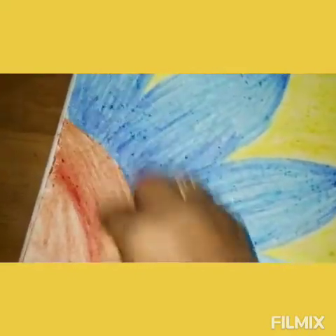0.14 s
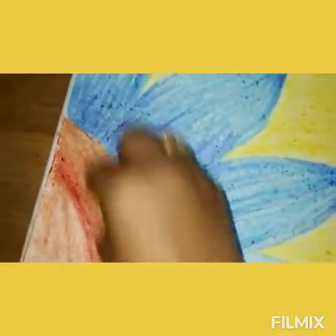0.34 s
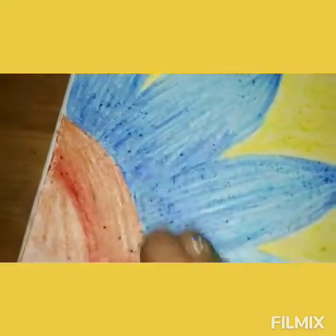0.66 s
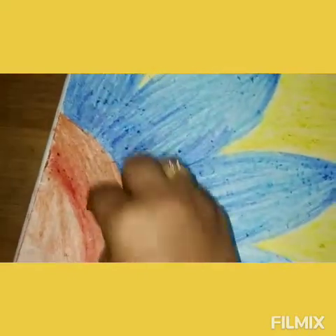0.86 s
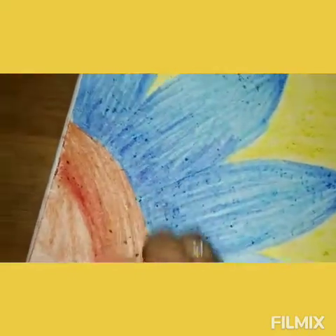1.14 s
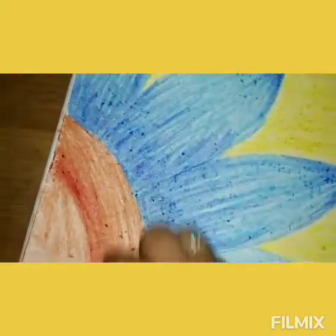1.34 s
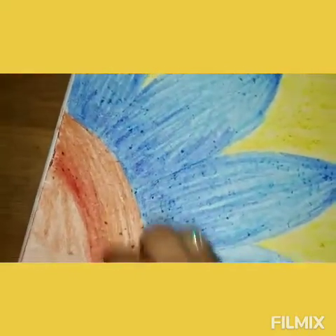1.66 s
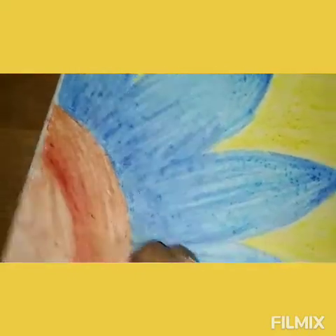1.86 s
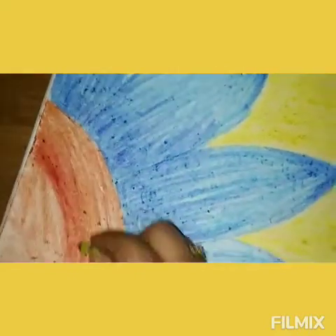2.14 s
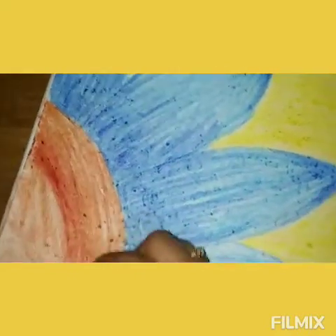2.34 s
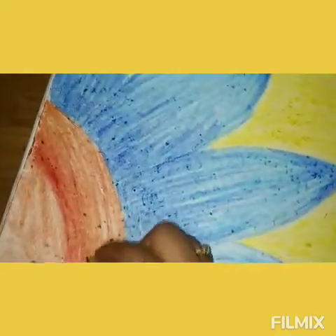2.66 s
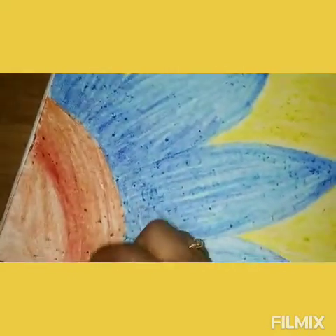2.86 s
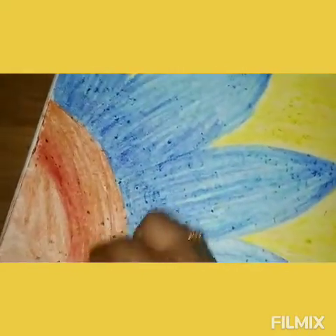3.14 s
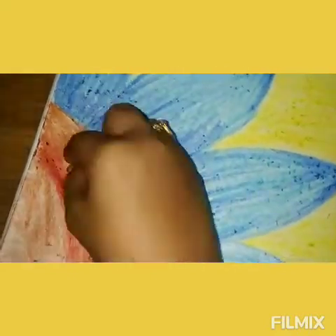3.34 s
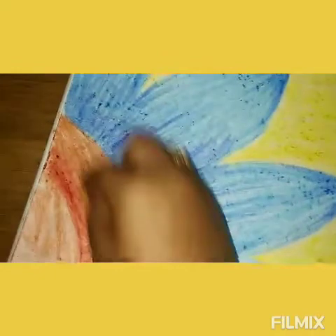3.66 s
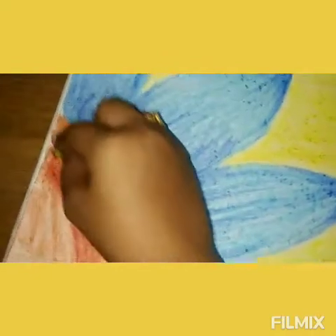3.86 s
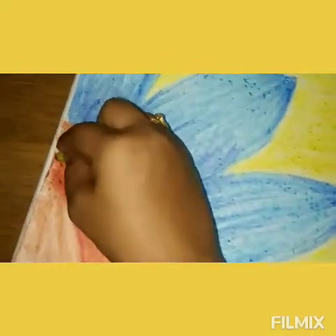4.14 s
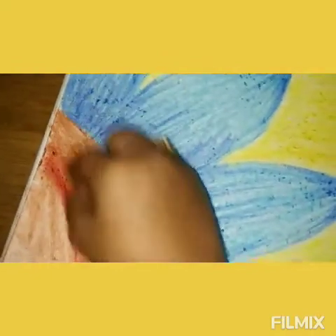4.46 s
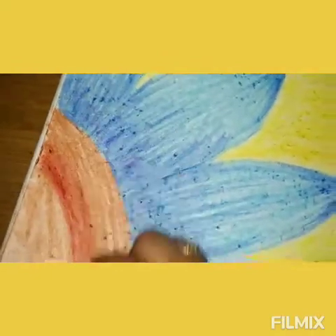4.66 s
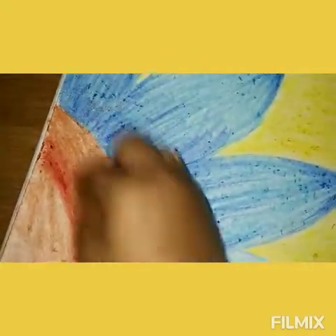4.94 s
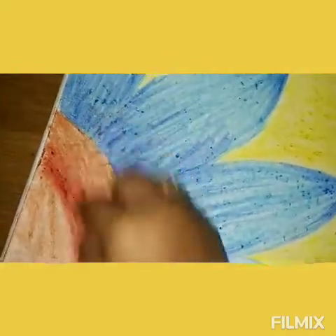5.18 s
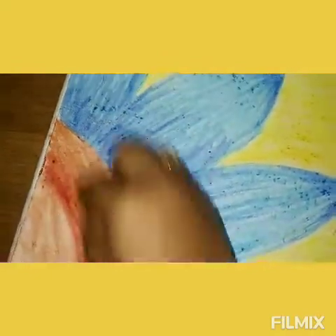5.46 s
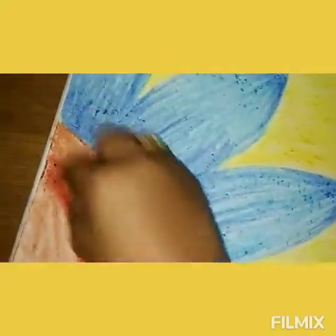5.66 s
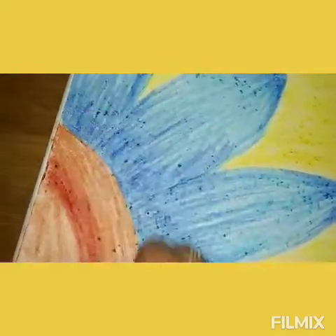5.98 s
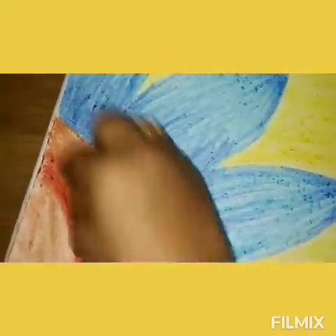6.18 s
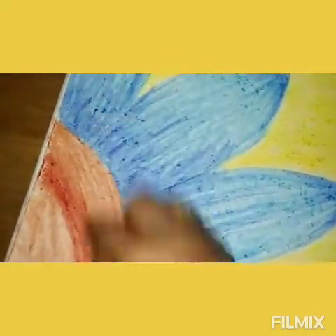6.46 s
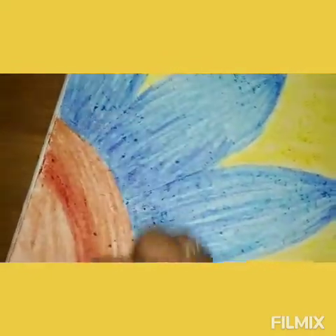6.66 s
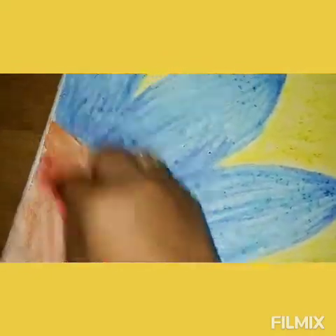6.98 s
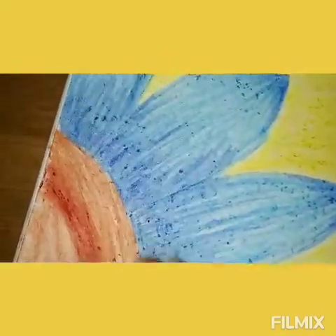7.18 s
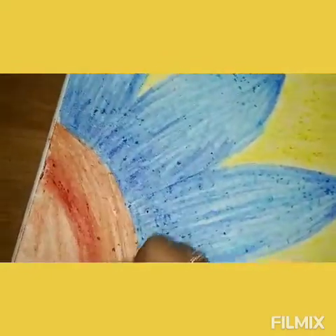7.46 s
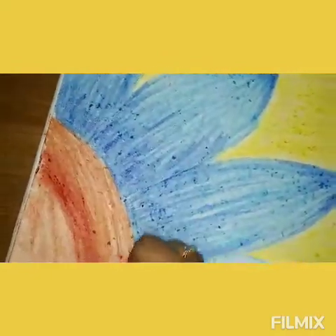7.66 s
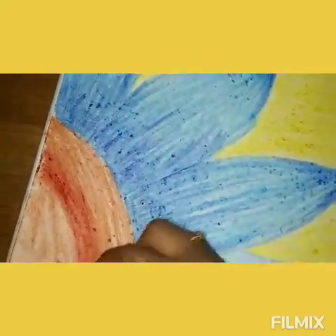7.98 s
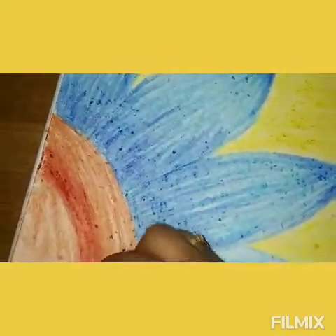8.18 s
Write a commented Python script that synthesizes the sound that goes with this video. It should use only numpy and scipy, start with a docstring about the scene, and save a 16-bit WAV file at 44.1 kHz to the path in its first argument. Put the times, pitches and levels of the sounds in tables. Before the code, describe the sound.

A wax crayon colours paper on a wooden table in short dry strokes, broken by hard scratchy scrapes and clicks, in a quiet room.

```python
"""Wooden table in a quiet room: a wax crayon colours a sheet of paper close to the left port of a phone.
Soft strokes: patchy noise of random contacts hisses on the paper's tooth. Hard scrapes: a dense crackle
of slips rings the sheet and shakes the table. Snaps: a few decaying rings; bumps of the hand: low swings.
The right port hears the crayon later, duller and shaded by the phone's body; a steady room tone lies below."""
import sys
import numpy as np
from scipy import signal
from scipy.fft import rfft, irfft, next_fast_len
from scipy.io import wavfile
from scipy.ndimage import uniform_filter1d

SR = 44100
rng = np.random.default_rng(int(sys.argv[2]) if len(sys.argv) > 2 else 0)


def waveform_to_disk(signal):
    """Save audio, clipped to [-1, 1], as 16-bit WAV at the path in sys.argv[1]."""
    frames = np.transpose(np.atleast_2d(signal))
    scaled = np.clip(frames, -1, 1) * 32767
    samples = np.round(scaled).astype(np.int16)
    wavfile.write(sys.argv[1], SR, samples)


N = 366912
PORT_LAG_S = 0.00009  # right port after left


def amp(db):
    """Decibels to gain."""
    return 10 ** (np.asarray(db) / 20)


def unit(x):
    """Scaled to rms 1."""
    return x / np.sqrt(np.mean(x ** 2) + 1e-20)


def along(points, hz):
    """(Hz, value) points interpolated on a log frequency axis."""
    f, v = np.transpose(points)
    return np.interp(np.log(hz + 1), np.log(f + 1), v)


def colour(points):
    """Zero-phase gain response through (Hz, dB) points."""
    return lambda hz: amp(along(points, hz))


def filtered(x, response):
    """x times a complex response of frequency, zero-padded by half a second or more."""
    m = next_fast_len(N + SR // 2)
    spectrum = rfft(x, m) * response(np.fft.rfftfreq(m, 1 / SR))
    return irfft(spectrum, m)[..., :N]


def noise(points):
    """Coloured noise of rms 1."""
    return unit(filtered(rng.standard_normal(N), colour(points)))


def modes(table):
    """Causal response of parallel resonances with alternating sign."""
    def response(hz):
        total = 0
        for k, (centre_hz, width_hz, db) in enumerate(table):
            damping = 1j * hz * width_hz
            total = total + (-1) ** k * amp(db) * damping / (centre_hz ** 2 - hz ** 2 + damping)
        return total
    return response


def skirt(hz):
    """The thin sheet radiates no bass: a steep double high-pass."""
    s = 1j * hz / 950
    return (s * s / (s * s + 1.285 * s + 1)) ** 2


def grit(rate_hz, spread_db):
    """Random contacts of uneven size, rms 1."""
    hits = rng.random(N) < rate_hz / SR
    sizes = rng.standard_normal(N) * amp(spread_db * rng.standard_normal(N))
    return unit(hits * sizes)


def patchy(x, depth_db):
    """Random gain in patches of pitch and time."""
    z = signal.stft(x, nperseg=512)[2]
    field = uniform_filter1d(rng.standard_normal(z.shape[-2:]), 6, 0)
    field = uniform_filter1d(field, 10, 1)
    return signal.istft(z * amp(depth_db * unit(field)), nperseg=512)[1][..., :N]


def tooth(points, patchy_db):
    """Coloured contacts with the tooth of the paper, rms 1."""
    return unit(filtered(patchy(grit(9000, spread_db=1), patchy_db), colour(points)))


# strokes: start t/s, length/s, level/dB, swell start to end/dB, dull share/dB, table rumble level/dB
STROKE_EVENTS = [(-0.03, 0.078, -73, 8.5, 2.5, -78), (0.139, 0.13, -61.5, 5, -2.5, -74),
                 (0.352, 0.12, -61.5, 0, -4, -74), (0.525, 0.18, -62.5, -1, 1, -68.5),
                 (0.778, 0.12, -63, 1.5, -1.5, -74), (0.972, 0.14, -61, 2.5, -3.5, -75),
                 (1.214, 0.078, -65.5, -0.5, -2.5, -81), (1.396, 0.081, -63.5, -1, -4, -76.5),
                 (1.562, 0.076, -66, 2, -3.5, -78), (1.71, 0.1, -62.5, 2.5, -5.5, -93),
                 (1.852, 0.048, -68, 2, 8.5, -64), (2.264, 0.018, -64, -16, -1, -81),
                 (2.471, 0.042, -74, 3, 2, -90), (2.573, 0.047, -67, 5, 2.5, -76),
                 (2.675, 0.064, -75.5, 7, 0, -89), (2.822, 0.048, -76, 3, 8, -97),
                 (2.943, 0.05, -75.5, 5, 3, -78), (3.076, 0.056, -69.5, -1.5, 4.5, -83),
                 (3.206, 0.202, -55, 12.5, -8, -67), (3.477, 0.15, -57, 5, -3, -76),
                 (3.668, 0.13, -55.5, -7.5, -1.5, -59), (4.266, 0.026, -74, 4, 6, -82),
                 (4.495, 0.26, -63.5, 3, 1, -76), (4.882, 0.19, -59.5, -1.5, -2.5, -70),
                 (5.176, 0.17, -59.5, 17, 2.5, -71.5), (5.456, 0.18, -57, -4, -3, -65.5),
                 (5.748, 0.21, -65, -9.5, 4, -70.5), (6.102, 0.23, -55.5, 2, -4.5, -67),
                 (6.434, 0.18, -53.5, -1.5, -7.5, -69.5), (6.75, 0.18, -63, 3, 0, -69.5),
                 (7.125, 0.15, -58, -7.5, -2, -70), (7.524, 0.044, -75, -1, -0.5, -81.5),
                 (7.653, 0.063, -66, -15.5, -9, -93), (7.748, 0.049, -67.5, 6, -1.5, -79),
                 (7.874, 0.06, -67.5, 2, 1, -87), (7.983, 0.042, -77, -3, 4.5, -83),
                 (8.097, 0.056, -72.5, 5, 3, -82), (8.259, 0.073, -78.5, 7, 4, -87)]
# fine tooth: f/Hz, relative density/(dB per Hz)
FINE_TOOTH = [(2000, -26.5), (3300, -15), (4500, -4), (5300, 1), (6200, 2), (6900, -1), (7700, 0.5),
              (8300, -12.5), (9500, -37)]
# broad rub: f/Hz, relative density/(dB per Hz)
BROAD_RUB = [(400, -21), (1000, 0), (1600, 0), (2200, -4.5), (3500, -2.5), (4800, 0.5), (7000, -35)]
# finest dust: f/Hz, relative density/(dB per Hz)
FINEST_DUST = [(7000, -28), (8500, 5), (10300, 2), (12000, -3.5), (13000, -15), (15500, -25)]
# table top resonances: f/Hz, width/Hz, level/dB
TABLE_MODES = [(172, 25.2, -1), (303, 38, 3.5), (585.5, 30, -0.5)]
ARCH_DB, DUST_SHARE_DB = 2.5, -9  # a stroke is fastest, so loudest, halfway; share of the finest dust


def strokes():
    """Each stroke speeds up, runs over the tooth of the paper and lifts off; the table hums along."""
    t = np.arange(N) / SR
    fine, dull, rumble = np.zeros((3, N))
    for start_s, length_s, db, swell_db, dull_db, rumble_db in STROKE_EVENTS:
        on = slice(max(int((start_s - 0.04) * SR), 0), int((start_s + length_s + 0.2) * SR))
        u = t[on] - start_s
        lift = 0.93 / (1 + np.exp((u - length_s) / 0.011))
        lift += 0.17 * amp(-60 * np.maximum(u - length_s, 0) / 0.055)  # the tip trails lightly
        edge = lift / (1 + np.exp(-u / (0.0039 + 0.024 * length_s)))  # long strokes start more gently
        way = np.clip(4 * (u / length_s - 0.5), -1, 1)  # -1 early, 0 halfway, 1 late
        press = edge * amp(db + swell_db * way / 2 - ARCH_DB * way ** 2)
        fine[on] += press
        dull[on] += press * amp(dull_db)
        rumble[on] += edge * amp(rumble_db)
    hum = unit(filtered(rng.standard_normal(N), modes(TABLE_MODES)))
    dust = amp(DUST_SHARE_DB) * tooth(FINEST_DUST, patchy_db=5)
    hiss = tooth(FINE_TOOTH, patchy_db=3.4) + dust
    return fine * hiss + dull * tooth(BROAD_RUB, patchy_db=1.4) + rumble * hum


# room tone: f/Hz, relative density/(dB per Hz)
ROOM_COLOUR = [(25, -42.5), (60, -23), (110, -5.5), (190, 0), (310, -4.5), (430, -12.5), (600, -4.5),
               (1000, -3.5), (1550, -5), (1800, -10), (2300, -11.5), (3300, -16), (7900, -25), (8600, -45),
               (15500, -42)]
# likeness of the ports: f/Hz, likeness/(0-1)
PORT_LIKENESS = [(60, 0.99), (250, 0.98), (520, 0.92), (1000, 0.42), (2600, 0.89), (3700, 0.16),
                 (8000, .05)]
# lean of the room tone: f/Hz, left over right/dB
ROOM_BALANCE = [(100, -5), (520, 4), (1100, -3.5), (1800, 0.5), (3400, 2.5), (6000, -0.5), (9000, -2)]


def room():
    """Steady room tone, alike at both ports in the bass, a little earlier at the left."""
    common, own = patchy(rng.standard_normal((2, N)), depth_db=1.5)

    def alike(hz):
        return np.clip(along(PORT_LIKENESS, hz), 0, 1)

    def shared(hz):
        return alike(hz) * np.exp(-2j * np.pi * hz * PORT_LAG_S)

    def port_gains(hz):
        half_lean_db = along(ROOM_BALANCE, hz) / 2
        return amp(along(ROOM_COLOUR, hz) + np.array([half_lean_db, -half_lean_db]))

    right = filtered(common, shared) + filtered(own, lambda hz: np.sqrt(1 - alike(hz) ** 2))
    return amp(-67.5) * unit(filtered(np.array([common, right]), port_gains))


# bumps: start t/s, peak level/dB, nominal f/Hz, length/s, deep rumble level at the bump's end/dB
BUMP_EVENTS = [(0.451, -49, 135, 0.016, -77), (0.486, -54.5, 141, 0.028, -73),
               (0.569, -47, 141, 0.015, -65), (0.639, -59, 156, 0.02, -67),
               (0.893, -65.5, 106, 0.015, -71.5), (1.203, -59.5, 108, 0.028, -80),
               (1.851, -57.5, 237, 0.032, -83), (2.249, -65, 102, 0.033, -77),
               (2.602, -59, 187, 0.03, -69.5), (3.314, -58, 262, 0.03, -90),
               (3.366, -53.5, 282, 0.023, -88), (3.698, -49.5, 119, 0.026, -68),
               (5.426, -47.5, 144, 0.028, -72.5), (5.833, -65, 106, 0.034, -72.5),
               (6.424, -59.5, 108, 0.03, -77)]
# deep rumble of the resting hand: t/s, level/dB
HAND_RUMBLE = [(0.0, -77), (0.39, -74.5), (1.13, -88), (1.32, -82), (1.78, -96), (2.87, -95), (3.24, -93),
               (3.61, -74), (3.84, -80), (4.87, -86), (5.01, -81), (5.19, -88.5), (6.35, -77.5),
               (6.58, -74.5), (6.98, -83), (7.67, -89.5), (7.76, -75), (8.32, -93)]
# colour of the deep rumble: f/Hz, relative density/(dB per Hz)
DEEP_COLOUR = [(25, -28.5), (60, -19.5), (95, 13), (140, 9), (220, -38.5)]
BUILD_DB_PER_S, FADE_DB_PER_S = 88.5, 149  # rumble before and after a bump's end


def bumps():
    """Soft thuds, a few low swings each, over the rumble of the hand, which swells around them."""
    out, now = np.zeros(N), np.arange(N) / SR
    rumble_db = np.interp(now, *np.transpose(HAND_RUMBLE))
    for start_s, db, hz, length_s, deep_db in BUMP_EVENTS:
        t = np.arange(round(length_s * SR)) / SR
        # the pitch sags as the flesh spreads
        swing = np.sin(2 * np.pi * hz * t * (1.15 - 0.18 * t / length_s))
        window = np.sin(np.pi * (t / length_s) ** 0.95) ** 2
        out[round(start_s * SR):][:len(t)] += amp(db) * window * swing
        after_s = now - start_s - length_s
        drop_db = np.maximum(FADE_DB_PER_S * after_s, -BUILD_DB_PER_S * after_s)
        rumble_db = np.maximum(rumble_db, deep_db - drop_db)
    return out + amp(rumble_db) * noise(DEEP_COLOUR)


# snaps of wax and paper: t/s, peak level before the high-pass/dB, low ring/dB,
# lean to the left before port shading/dB, favoured f/Hz
SNAP_EVENTS = [(0.527, -41, -4, -7, 2920), (0.552, -31.5, -8.5, -3, 2600), (1.8635, -31.5, 2.5, -6, 4360),
               (1.9138, -40, -6, -4, 3000), (1.9594, -32, -15, 3, 3670), (2.2677, -45, -17, -9, 3080),
               (3.2438, -42.5, -6, -4, 4420), (3.495, -46, -9.5, 4, 5080), (3.5534, -49, -9.5, 3, 5090),
               (3.623, -35.5, -9, 0, 3120), (3.6705, -21.5, -20, -10, 2930), (3.678, -15.5, -8, 0, 3460),
               (3.9496, -32.5, -9, -4, 2730), (3.974, -29, 13, 7, 2700), (3.9796, -19, 1.5, -0.5, 2300),
               (3.985, -24.5, 8, -4, 3060), (4.0063, -16.5, 3, 4, 2700), (4.159, -35, 4, 0, 2520),
               (4.1665, -29, 17, 7, 3220), (4.181, -34, 0, 9, 2440), (4.931, -41, -12.5, 12, 4260),
               (4.989, -42, -1, 1, 4780), (5.2837, -25, -4, 7, 3500), (5.3121, -12, -10, 10.5, 4180),
               (5.5233, -18.5, -8.5, -1, 3440), (5.5297, -20.5, -13, 13, 3680), (5.5394, -31, -7, 3, 3780),
               (5.7521, -29, -14, 13, 3600), (5.824, -31, -13, 5, 4080), (5.8374, -22, -9, 5, 2950),
               (5.8432, -41, -2.5, 5, 4750), (6.16, -28, -15.5, 8, 3200), (6.1675, -31, -8, 8, 3594),
               (6.175, -20.5, -3.5, 8, 4340), (6.1813, -15, -9, 1.5, 3290), (6.1875, -15.5, -14, -6, 3594),
               (6.1925, -5.5, -6, 6.5, 3400), (6.2014, -7, -8.5, -2, 3420), (6.2119, -9.5, -23, -3, 3127),
               (6.326, -24.5, -15, 19, 3460), (6.4326, -41, -6.5, 4, 5360), (6.808, -43, -13, 6, 5200),
               (6.8204, -30.5, -22, 6, 4680), (7.0588, -27, -17, -5.5, 4680),
               (7.0742, -16, -5.5, -2.5, 3240), (7.0889, -12, -11, -8.5, 4730), (7.0962, -7, -2.5, 8, 3930),
               (7.1204, -17, -15, 6, 4010)]
# sheet resonances, low, middle and high group: f/Hz, width/Hz, relative level/dB
LOW_MODES = [(1365, 786, -3.5), (1607, 560, -0.5)]
MID_MODES = [(2320, 970, -5.5), (3270, 860, -0.5), (4038, 860, -0.5), (4820, 940, -2.5), (5770, 1000, -9.5)]
HIGH_MODES = [(6900, 1120, -0.5), (10920, 3200, -9.5)]
# high ring of a snap at the soft level; lost per dB of a stronger one
SOFT_SNAP_DB, SOFT_TREBLE_DB, TREBLE_LOSS_DB_PER_DB = -46, -5, 0.23


def snaps():
    """A snap is a few quick slips; each rings the sheet, most of all near the pitch that the spot favours."""
    out, t = np.zeros((2, N)), np.arange(400) / SR
    draws = rng.random((len(SNAP_EVENTS), 3, 10))  # per slip: a wait and nine ring sizes
    for (start_s, db, low_db, lean_db, pitch_hz), draw in zip(SNAP_EVENTS, draws):
        high_db = SOFT_TREBLE_DB - TREBLE_LOSS_DB_PER_DB * (db - SOFT_SNAP_DB)
        rings = [(hz, w, g + low_db) for hz, w, g in LOW_MODES]
        rings += [(hz, w, g - 4 * abs(np.log2(hz / pitch_hz))) for hz, w, g in MID_MODES]
        rings += [(hz, w, g + high_db) for hz, w, g in HIGH_MODES]
        snap = np.zeros(len(t))
        for k, (wait, *sizes) in enumerate(draw):
            late = np.maximum(t - 0.000905 * k * (0.709 + 0.6 * wait), 0)
            soft = 1 - np.exp(-late / 0.00051)  # wax gives a little before it lets go
            for m, ((hz, width_hz, g), size) in enumerate(zip(rings, sizes)):
                gain = (-1) ** m * amp(g - 6.3 * k + 11 * size)  # later slips tend to be weaker
                decay = np.exp(-np.pi * width_hz * late)
                snap += gain * soft * decay * np.sin(2 * np.pi * hz * late)
        first = round(start_s * SR)
        out[:, first:first + len(t)] += amp([[db], [db - lean_db]]) * snap / np.abs(snap).max()
    return filtered(out, skirt)


# hard scrapes: t of full pressure/s, level before sheet and table gains/dB, rise/s, hold/s, fall/s,
# low ring/dB, high ring/dB
SCRAPE_EVENTS = [(1.934, -37, 0.032, .027, 0.031, 1.5, -12.5), (3.363, -50.5, 0.1, 0.033, 0.031, -3, -7),
                 (3.68, -35.5, 0.025, .001, .03, -7, -15.5), (3.977, -35, 0.035, 0.0082, 0.037, 5, -12),
                 (4.005, -35, .002, 0.0008, 0.013, 2, -11.5), (4.165, -50, 0.0053, .012, .003, 4, -11),
                 (4.179, -40.5, .002, .002, 0.03, 3.5, -8.5), (5.31, -27.5, 0.047, 0.0051, 0.034, 1, -13.5),
                 (5.522, -41.5, 0.0034, .004, .05, -3, -9.5), (5.835, -39.5, .002, 0.0011, 0.03, -4, -14.5),
                 (6.19, -30.5, 0.041, 0.028, .04, 1, -13.5), (6.441, -58, 0.055, .04, 0.072, 1.5, -24),
                 (6.821, -57.5, 0.053, 0.0041, .06, 2, -3), (7.061, -34, 0.018, .017, 0.013, -2, -19),
                 (7.086, -28.5, 0.02, 0.03, 0.025, 3, -11.5)]
# table body under a scrape: f/Hz, relative density/(dB per Hz)
TABLE_BODY = [(30, -28.5), (100, -12.5), (250, -2), (420, -10), (800, -5.5), (1200, -16.5)]
RAMP_DB, DUST_FOLLOWS = 29.5, 0.8  # change over a rise or fall time; fine dust follows less steeply
SHEET_DB, SHAKE_DB, JOLT_DB = 14, -15.5, -36.5  # sheet, table body and deep rumble


def scrapes():
    """Pressed hard, the wax sticks and slips in a dense crackle that rings the sheet and shakes the table."""
    t = np.arange(N) / SR
    level, low, high = np.zeros((3, N))
    for full_s, db, rise_s, hold_s, fall_s, low_db, high_db in SCRAPE_EVENTS:
        on = slice(int((full_s - 1.2 * rise_s) * SR), int((full_s + hold_s + 1.4 * fall_s) * SR))
        before = (full_s - t[on]) / rise_s
        after = (t[on] - full_s - hold_s) / fall_s
        ease_db = RAMP_DB * np.maximum(0, np.maximum(before, after))
        level[on] += amp(db - ease_db)
        low[on] += amp(db + low_db - ease_db)
        high[on] += amp(db + high_db - DUST_FOLLOWS * ease_db)
    clumps = amp(2 * unit(uniform_filter1d(rng.standard_normal(N), 130)))  # slips come in bunches
    slips = unit(clumps * grit(6000, spread_db=0.5))
    dust = grit(12000, spread_db=2)  # the treble comes from finer, denser contacts

    def ring(x, group):
        return filtered(x, lambda hz: modes(group)(hz) * skirt(hz))

    sheet = ring(low * slips, LOW_MODES) + ring(level * slips, MID_MODES) + ring(high * dust, HIGH_MODES)
    shake = amp(SHAKE_DB) * uniform_filter1d(level, 600) * noise(TABLE_BODY)
    jolt = amp(JOLT_DB) * uniform_filter1d(level, 3000) * noise(DEEP_COLOUR)
    return amp(SHEET_DB) * sheet + shake + jolt


def scatter(x, t60_s):
    """x through random reflections of energy 1; they change as the hand moves, in overlapping blocks."""
    size = 2048
    out, t = np.zeros(N + SR), np.arange(round(t60_s * SR)) / SR
    window = np.sin(np.pi * np.arange(size) / size)
    padded = np.pad(x, (size // 2, size))
    for start in range(0, N, size // 2):
        tail = rng.standard_normal(len(t)) * amp(-60 * t / t60_s)
        part = signal.fftconvolve(padded[start:start + size] * window, tail / np.linalg.norm(tail))
        out[start:start + len(part)] += part
    return out[size // 2:][:N]


# shading of the right port: f/Hz, gain/dB
RIGHT_SHADE = [(50, -2.5), (170, -1.5), (600, -3.5), (1100, -3), (2100, -5), (3800, -14), (5600, -8.5),
               (7600, -15), (8600, -40), (12000, -25.5), (14000, -13)]
# amplitude share reaching the right port unscattered: f/Hz, share/(0-1)
DIRECT_SHARE = [(40, 0.31), (100, .6), (300, 0.77), (700, 0.91), (1500, 0.12), (3100, 0), (4000, 0.1),
                (8000, 0)]


def ports(left, right):
    """The left port hears the crayon directly; the right one shaded, later and partly scattered off the table."""
    def share(hz):
        return np.clip(along(DIRECT_SHARE, hz), 0, 1)

    direct = filtered(right, lambda hz: share(hz) * np.exp(-2j * np.pi * hz * PORT_LAG_S))
    diffuse = filtered(scatter(right, t60_s=0.021), lambda hz: np.sqrt(1 - share(hz) ** 2))
    return np.array([left, filtered(direct + diffuse, colour(RIGHT_SHADE))])


def scene():
    """Crayon and hand near the phone, a faint answer of the walls, the room tone."""
    left, right = strokes() + bumps() + snaps() + scrapes()
    wall_left = scatter(left, t60_s=0.15)
    wall_right = amp(-15.5) * scatter(left, t60_s=0.12)
    walls = amp(-23) * np.array([wall_left, wall_right])
    return ports(left, right) + walls + room()


def record(dry):
    """The phone keeps nothing above its band limit."""
    top_hz = 15687
    return filtered(dry, lambda hz: hz < top_hz)


dry = scene()
out = record(dry)
waveform_to_disk(out)
```